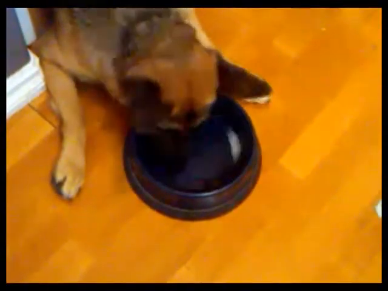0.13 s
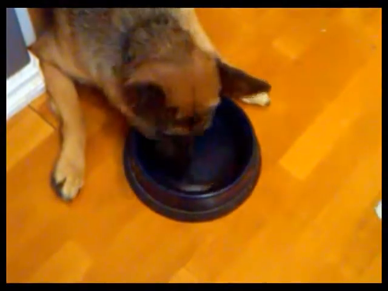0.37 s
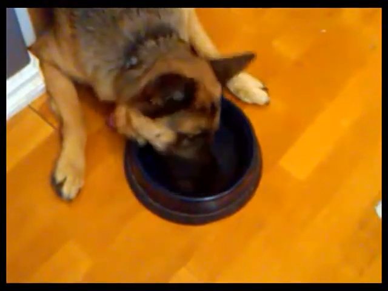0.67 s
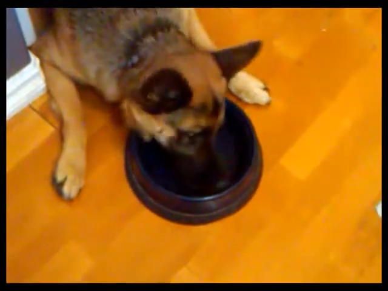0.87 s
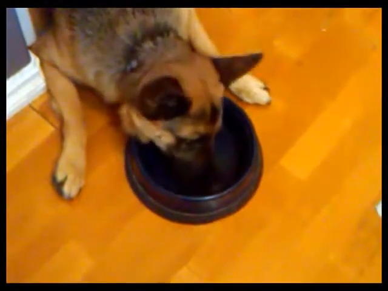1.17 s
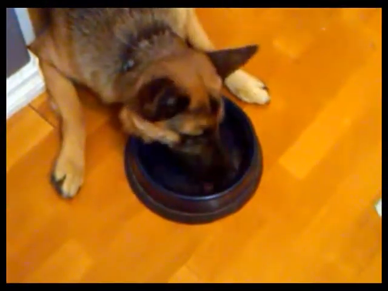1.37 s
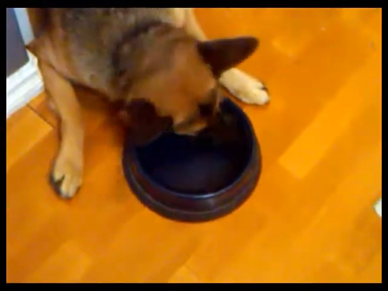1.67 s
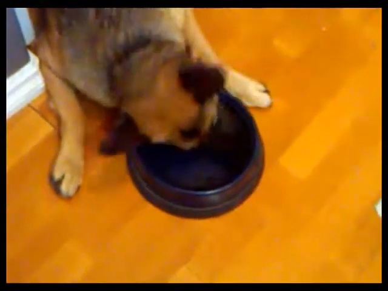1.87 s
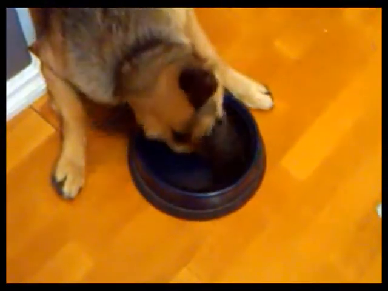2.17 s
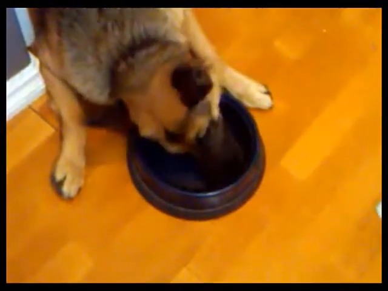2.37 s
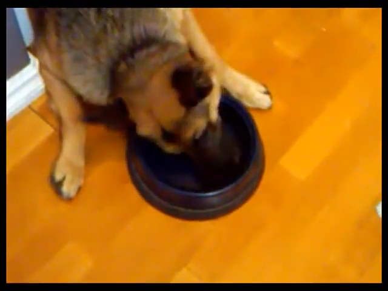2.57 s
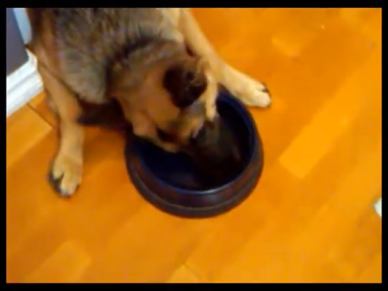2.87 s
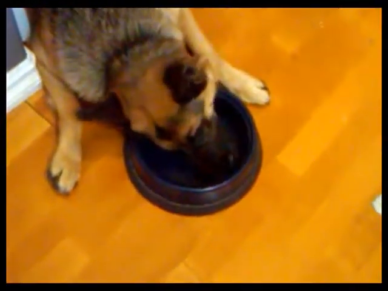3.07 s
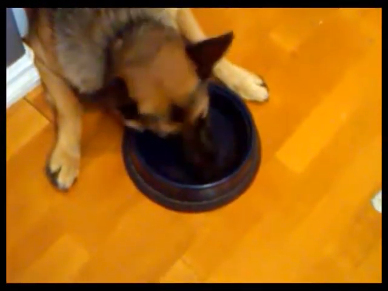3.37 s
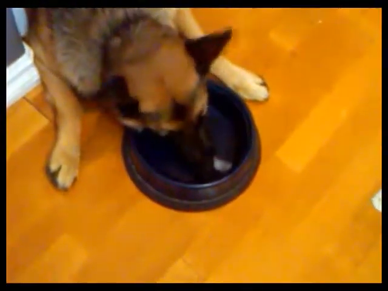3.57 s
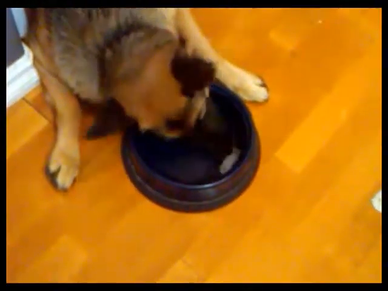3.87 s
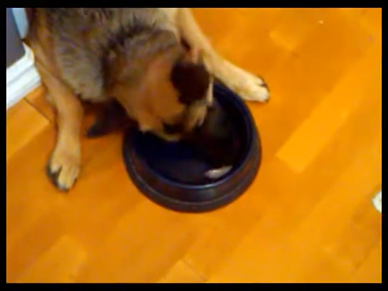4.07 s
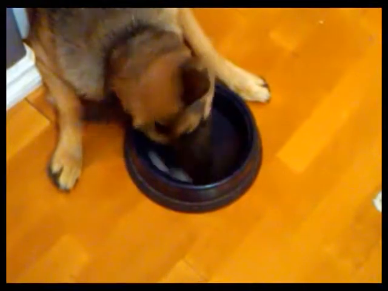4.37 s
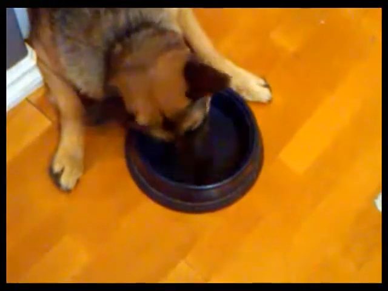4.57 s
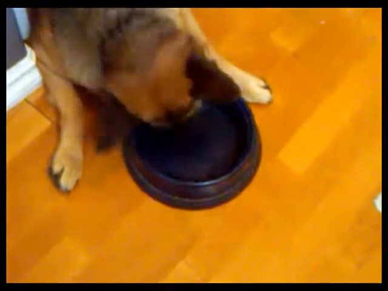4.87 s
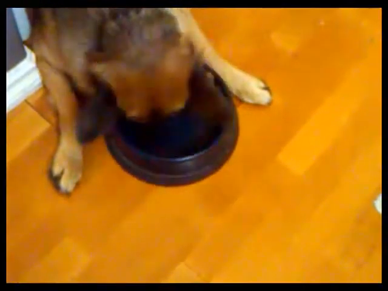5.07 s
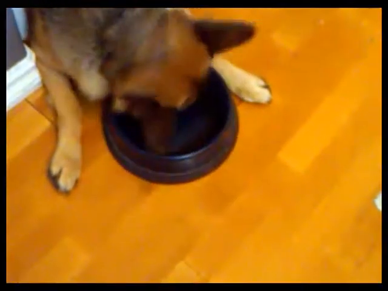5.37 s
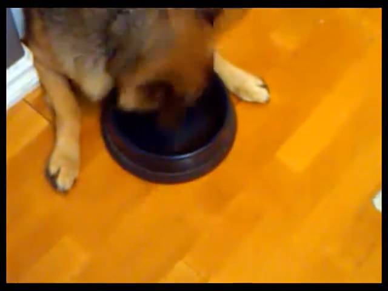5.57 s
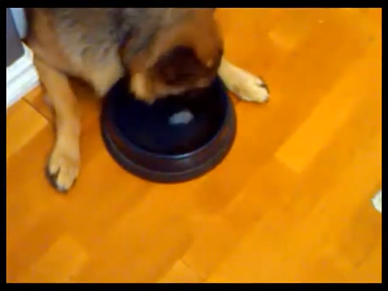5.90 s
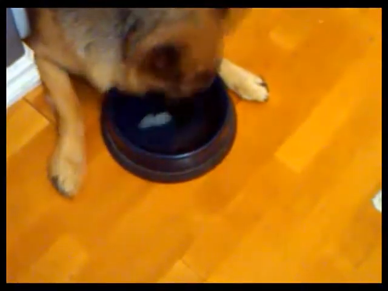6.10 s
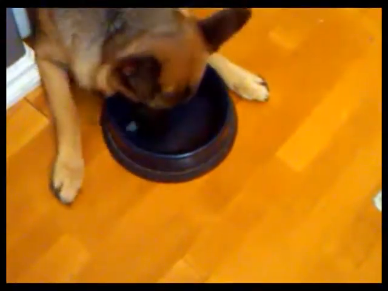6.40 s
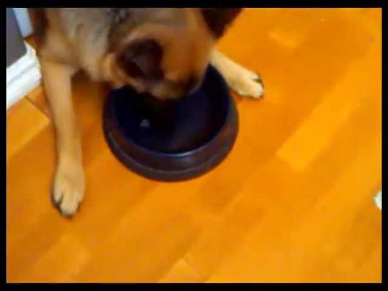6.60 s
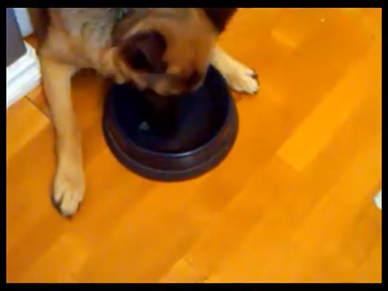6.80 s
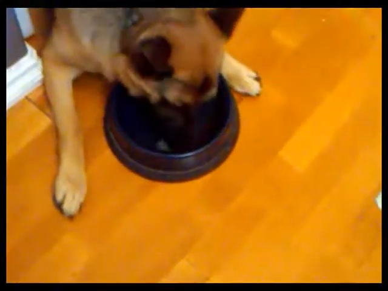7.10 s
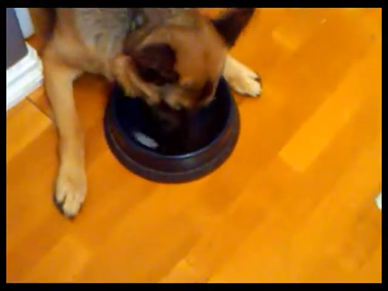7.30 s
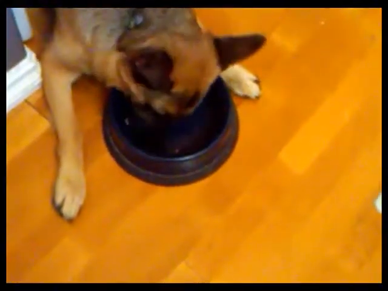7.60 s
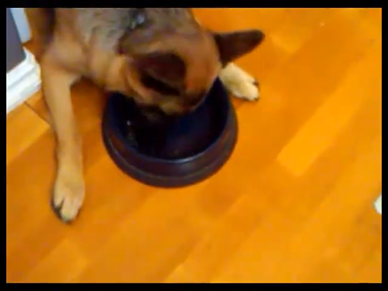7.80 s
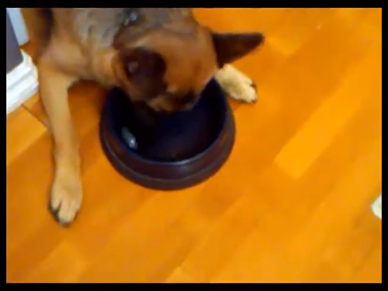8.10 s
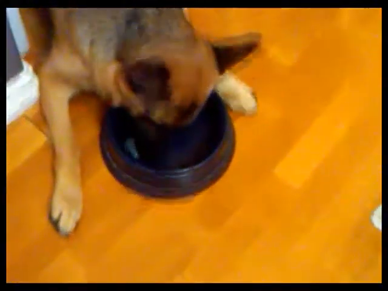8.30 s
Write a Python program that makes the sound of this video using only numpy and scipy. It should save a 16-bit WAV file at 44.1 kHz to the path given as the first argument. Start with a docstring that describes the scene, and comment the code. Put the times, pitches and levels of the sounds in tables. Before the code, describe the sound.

A dog pushes a lump of ice around a hard plastic bowl with faint wet licks. The ice clacks, cracks and skids in irregular bursts, thins to light ticks, then picks up again. Past the middle the bowl thumps and drags on the wooden floor and the ice squeaks briefly, before more sharp knocks. A small microphone catches it in a bare, slightly echoing room with faint hum and hiss.

```python
"""On the wooden floor of a bare room, a dog noses and licks a lump of ice round a hard plastic bowl.
Impacts and sliding friction excite the modes of the bowl's wall; bumps and drags on the boards excite
the air under it. The ice cracks and sheds shards, and squeaks by stick-slip; bubbles of melt water
burst at the tongue, and a thin whistle comes and goes. The room reverberates over a steady hum,
and a small microphone adds its hiss."""
import sys
import numpy as np
from scipy import signal
from scipy.fft import rfft, irfft
from scipy.io import wavfile
from scipy.ndimage import uniform_filter1d

SR = 44100
rng = np.random.default_rng(int(sys.argv[2]) if len(sys.argv) > 2 else 0)


def dump(signal):
    """Clip the signal to [-1, 1] and save it as 16-bit WAV at the path in sys.argv[1]."""
    limited = np.clip(np.atleast_2d(signal).T, -1, 1)
    pcm = np.round(limited * 32767).astype(np.int16)
    wavfile.write(sys.argv[1], SR, pcm)


N = 372644


def from_db(db):
    """Amplitude ratio of a level in decibels."""
    return 10 ** (np.asarray(db) / 20)

def unit_rms(x):
    """Normalisation to unit power."""
    return x / np.sqrt(np.mean(x ** 2) + 1e-20)

def butterworth(x, order, hz, kind):
    """Filtering with a maximally flat passband."""
    return signal.sosfilt(signal.butter(order, hz, kind, fs=SR, output="sos"), x)

def at_hz(table, hz, column=1):
    """Interpolation of a spectrum on a logarithmic frequency axis."""
    table = np.array(table)
    return np.interp(np.log(hz), np.log(table[:, 0]), table[:, column])

def coupling(hz, best_hz, octaves):
    """Modal coupling: a bell curve, 1 where the two frequencies meet."""
    return np.exp(-(np.log2(hz / best_hz) / octaves) ** 2)

def impulses(start_s, gains):
    """Brief contacts idealised as an impulse train."""
    out = np.full(N, 1e-18)
    np.add.at(out, np.clip((np.asarray(start_s) * SR).astype(int), 0, N - 1), gains)
    return out

def ring(force, hz, t60_s):
    """Damped oscillator: a unit impulse starts a decaying sine of height 1."""
    r, w = from_db(-60 / (t60_s * SR)), 2 * np.pi * hz / SR
    return signal.lfilter([0, np.sin(w)], [1, -2 * r * np.cos(w), r * r], force)

def decays(start_s, level_db, t60_s):
    """Exponential decay from each onset."""
    return signal.lfilter([1], [1, -from_db(-60 / (t60_s * SR))], impulses(start_s, from_db(level_db)))

def grit(per_s, spread_db):
    """Shot noise: randomly timed impulses of uneven size."""
    sizes = from_db(spread_db * np.minimum(rng.exponential(1, N), 4)) * rng.choice([-1, 1], N)
    return unit_rms(sizes * (rng.random(N) < per_s / SR)) + 1e-18

def narrow_noise(bands):
    """Noise-driven resonances, with decay time inverse to bandwidth."""
    return sum(from_db(db) * unit_rms(ring(rng.standard_normal(N), hz, np.log(1000) / np.pi / width_hz))
               for hz, width_hz, db in bands)

def strokes(rows, knee, ends_db, glide=1):
    """Envelopes: a row has its level at the share `knee` of its length, offset by ends_db at both ends.
    Further columns become curves too; the last moves by the ratio `glide` after the knee."""
    points = []
    for start_s, length_s, db, *rest in rows:
        end_s, final = start_s + length_s, [*rest[:-1], *np.multiply(rest[-1:], glide)]
        points += [(start_s - .01, -120, *rest), (start_s, db + ends_db, *rest),
                   (start_s + knee * length_s, db, *rest),
                   (end_s, db + ends_db, *final), (end_s + .01, -120, *final)]
    times, *columns = np.transpose(points)
    return [np.interp(np.arange(N) / SR, times, column) for column in columns]

def pings(start_s, level_db, hz, rise_cycles, decay_cycles):
    """Transients of constant Q: each sine swells, then falls 60 dB, in set numbers of cycles."""
    samples = np.arange(SR // 40)
    cycles = samples / SR * hz[:, None]
    rise = np.sin(np.pi / 2 * np.minimum(cycles / rise_cycles, 1)) ** 2
    fall = from_db(level_db[:, None] - 60 * np.maximum(cycles - rise_cycles, 0) / decay_cycles)
    out = np.zeros(N + SR)
    np.add.at(out, (start_s * SR).astype(int)[:, None] + samples, np.sin(2 * np.pi * cycles) * rise * fall)
    return out[:N]


# hum of the house: pitch_hz, width_hz, level_db
HUM_BANDS = [(88, 18, -80.5), (353.4, 8.8, -76.5)]

def hum():
    """Narrow-band noise is heard as a steady low hum."""
    return narrow_noise(HUM_BANDS)

# room tone and microphone noise: frequency_hz, relative_density_db
HISS_SPECTRUM = [(18, -31), (30, -4), (62, -8), (100, -5), (140, -10), (340, -6), (450, -14), (1000, -15),
                 (1600, -20), (3150, -24), (7200, -31), (9360, -61), (15800, -120)]

def hiss():
    """Stationary noise: white noise takes the colour of the quiet room and the microphone."""
    hz = np.maximum(np.arange(N // 2 + 1) * SR / N, 1)
    spectrum = rfft(rng.standard_normal(N)) * from_db(at_hz(HISS_SPECTRUM, hz))
    return from_db(-69) * unit_rms(irfft(spectrum, N))

def rounded_contact(x):
    """Contact time limits bandwidth: a rounded face of the ice imparts little treble."""
    return butterworth(x, 3, 2400, "low")

# modes of the bowl's wall: pitch_hz, level_db, t60_s
WALL_MODES = [(594, -15.5, 0.03), (622, -6, 0.045), (798, 0, 0.057), (876, -1, 0.054), (910, -4, 0.027),
              (1055.4, -6, 0.06), (1185, -5, 0.032), (1268.6, -1.5, 0.046), (1312, -1.5, 0.048),
              (1389, -11, 0.0056), (1569.4, 1, 0.031), (1680, -6, 0.053), (1807.7, -3.5, 0.041),
              (1946, 0, 0.017), (2100, 1.5, 0.012), (2330, -2, 0.0033), (2440, -9.5, 0.014),
              (2527, -8.5, 0.024), (2890, -14.5, 0.022), (3070, -15.5, 0.022), (3270, -17.5, 0.0058),
              (3640, -26, 0.0083), (4160, -14.5, 0.017)]

def wall(force):
    """Modal superposition: force(k, hz, edge_share) drives mode k; hard edges reach the high modes."""
    low = high = 0
    for k, (hz, level_db, t60_s) in enumerate(WALL_MODES):
        edge_share = np.clip(np.log2(hz / 1800) / 0.98, 0, 1)
        mode = from_db(level_db) * ring(force(k, hz, edge_share), hz, t60_s)
        if edge_share > 0:
            high += mode
        else:
            low += mode
    return rounded_contact(low) + high

# modes of the air under the bowl: pitch_hz, level_db, t60_s
CAVITY_MODES = [(156, -27, 0.0017), (190, -11.5, 0.0014), (225, -18, 0.071), (292.7, 1.5, 0.14),
                (348.5, -4, 0.15), (457, -29, 0.001), (570, -11.5, 0.019)]

def cavity(force):
    """Cavity resonance: force(k, hz, mode_db) drives mode k of the air under the bowl."""
    return sum(ring(force(k, hz, db), hz, t60_s) for k, (hz, db, t60_s) in enumerate(CAVITY_MODES))

# ice striking the bowl: start_s, level_db, spot_pitch_hz, hard_edge_db, chatter_db
ICE_KNOCKS = [(0.0165, -13.5, 1580, -7, -12), (0.031, -23.5, 1060, -5.5, -8),
              (0.075, -23, 1780, -8.5, -9.5), (0.104, -17.5, 1130, -13.5, -11),
              (0.173, -32, 1100, -16.5, -13), (0.275, -35.5, 1250, -38.5, -5),
              (0.292, -22, 1220, -19.5, -11.5), (0.384, -15.5, 1207, -12, -20.5),
              (0.412, -29, 880, -24, -31), (0.628, -11.5, 1570, -7, -8), (0.6367, -7, 1325, -28, -32.5),
              (0.648, -22.5, 1500, -11, -18), (0.657, -17.5, 1310, -14.5, -5.5),
              (0.722, -29, 1580, -8, -10), (0.745, -24, 900, -12, -16), (0.771, -21, 1360, -12, -41),
              (0.781, -24.5, 1530, -11.5, -19), (0.798, -27.5, 880, -3.5, -13),
              (1.204, -18.5, 1260, -12, -26), (1.243, -21.5, 1340, -8.5, -12), (1.276, -21, 1650, 5, -22.5),
              (1.296, -33.5, 930, -6.5, -3), (1.439, -29.5, 1300, -7.5, -11),
              (1.473, -22.5, 1350, -13.5, -22), (1.558, -30, 940, -6, -11.5), (1.648, -25, 1680, -6, -18),
              (1.721, -27, 1760, -3, -16), (1.752, -38, 840, -8, -6), (1.82, -32, 790, -1.5, -9),
              (1.861, -29, 980, -13, -12), (2.004, -43.5, 1100, -24, -1.5), (2.088, -38, 1820, -7, -12.5),
              (2.156, -30.5, 1790, -11, -21), (2.182, -36, 1170, -42, -14.5),
              (2.281, -32.5, 740, 3.5, -13.5), (2.351, -49, 1785, 5, -24), (2.538, -52, 630, -22, -23),
              (2.683, -51, 643, -25, -13), (2.699, -31, 943, -5, -4.5), (2.716, -43, 910, 0.5, -25),
              (2.869, -36, 1240, -13, -24), (2.939, -30.5, 1146, -16, -12), (3.01, -42, 874, -22, -6.5),
              (3.09, -38, 1264, -32, -13.5), (3.366, -40.5, 1260, -32, -18), (3.52, -34, 1330, -16.5, -17),
              (3.557, -49, 1354, -20, -34), (3.809, -29.5, 1050, -10, -14), (3.962, -29, 1160, -8, -20),
              (4.076, -20.5, 1680, -10, -18.5), (4.101, -25.5, 1670, -3, -9),
              (4.152, -23.5, 1710, -5.5, -12), (4.286, -22, 1290, -13, -26),
              (4.5355, -26.5, 1810, -7.5, -11.5), (4.555, -44, 2080, -14, -21.5),
              (4.577, -33, 1320, -29, -23), (4.606, -31, 2000, -34, -17), (4.637, -35, 790, -10, -9),
              (4.652, -28, 1940, -25, -33), (4.668, -15, 1260, -11.5, -27), (4.681, -22.5, 1900, -21, -20),
              (4.734, -26.5, 1210, -13.5, -9), (4.852, -44, 1190, -36, -17), (5.035, -38.5, 1770, -32, -20),
              (5.074, -44, 1230, -44, -7), (5.116, -32, 1110, -24.5, -19), (5.14, -26, 630, -8, -28),
              (5.172, -31.5, 880, -39, -5.5), (5.192, -22, 1780, -11, -22), (5.214, -26, 1740, -22, -7.5),
              (5.264, -20.5, 1200, -15, -15.5), (5.372, -32.5, 1480, -22, -9),
              (5.446, -36.5, 1290, -22, -1.5), (5.461, -34.5, 1310, -38, -6),
              (5.551, -33, 1570, -15.5, -11.5), (5.611, -37.5, 836, -25.5, -10.5),
              (5.859, -50, 844, -24, 8.5), (5.864, -23.5, 797, -11.5, -18.5), (6.003, -18.5, 750, -16, -21),
              (6.006, -18.5, 990, -7.5, -12.5), (6.0102, -8.5, 1170, -11.5, -21),
              (6.048, -18.5, 600, -38, -17), (6.126, -31.5, 600, -14, -10), (6.187, -41, 625, -3.5, -28),
              (6.442, -48.5, 920, -14, -31), (6.483, -32.5, 1093, -10.5, -3.5),
              (6.506, -24.5, 1130, -14.5, -8.5), (6.776, -33, 1360, -11.5, -10.5),
              (7.104, -27, 860, -27.5, -14.5), (7.129, -49.5, 775, -29, -23),
              (7.284, -51.5, 900, -30.5, -10.5), (7.3, -42.5, 1310, -41.5, -22),
              (7.344, -20, 1275, -27, -19), (7.378, -42.5, 1330, -47.5, -21), (7.404, -40, 1400, -46, -14),
              (7.431, -7, 1366, -14, -21), (7.451, -33.5, 905, 2, -14), (7.465, -36.5, 1330, -6, -20.5),
              (7.483, -39, 1330, -10, -28), (7.511, -34.5, 1330, -13, -22.5), (7.642, -35, 1300, -28, -23),
              (7.704, -34.5, 1320, -33, -10.5), (7.738, -24, 1270, -19, -12.5),
              (7.755, -30, 1900, -14, -14.5), (7.757, -38, 1810, -18, -5.5), (7.76, -33, 2000, -22, -14),
              (7.764, -30.5, 1620, -22, -29), (7.77, -28, 855, -21, -25.5), (7.779, -43.5, 870, -11, -32),
              (7.998, -16.5, 1278, -16.5, -15.5), (8.029, -38.5, 1370, -7.5, -8)]

def knocks(slips, splinters):
    """Impact excitation: each blow favours the modes near the pitch of the spot struck, then chatters."""
    start_s, level_db, spot_hz, edge_db, chatter_db = np.transpose(ICE_KNOCKS)
    scatter_db = 2.5 * rng.uniform(-2.1, 1, (len(start_s), len(WALL_MODES)))
    # rough ice lands in three contacts within 3 ms, each weaker than the one before in the series
    chance = rng.random((len(start_s), 6))
    contact_s = start_s[:, None] + .003 * chance[:, :3] * [0, 1, 1]
    contact_gain = from_db(-0.5 - 7 * np.arange(3)) * np.sign(chance[:, 3:] - .5)

    def force(k, hz, edge_share):
        spot_db = 9.9 * coupling(hz, spot_hz, 0.18) + scatter_db[:, k]
        blow_db = level_db - 20 + spot_db + edge_share * (edge_db + 19)
        blows = (-1) ** k * impulses(contact_s, from_db(blow_db)[:, None] * contact_gain)
        chatter = decays(start_s, blow_db - 0.62 * spot_db + chatter_db - 10, 0.11)
        # slips touch shifting spots; splinters strike all modes at once
        return blows + chatter * (np.roll(slips, 97 * k) + from_db(-6.5) * splinters)

    # the contact itself radiates a bright burst, grit and a dry snap
    bright_db = level_db + edge_db
    swell = decays(start_s, bright_db - 6.5, 0.047) - decays(start_s, bright_db - 8, 0.0059)
    burst = butterworth(swell * rng.standard_normal(N), 2, [2500, 6000], "band")
    grains = rasp(slips + splinters, decays(start_s, bright_db + chatter_db + 2.5, 0.084))
    snap = pings(start_s, level_db - 4, spot_hz, rise_cycles=1.5, decay_cycles=10)
    boom = cavity(lambda k, hz, mode_db: impulses(start_s + 0.0017, from_db(level_db - 26 + mode_db)))
    return wall(force) + rounded_contact(boom + snap) + burst + grains

def rasp(roughness, envelope):
    """Roughness noise: tiny contacts radiate directly in a treble band."""
    return butterworth(roughness * envelope, 3, [2800, 3900], "band")

# fractures in the ice: start_s, level_db, pitch_hz
ICE_CRACKS = [(0.0169, -18.5, 3400), (0.0737, -21, 2660), (0.1027, -24.5, 2840), (0.2773, -52, 2200),
              (0.2947, -42, 2450), (0.3835, -36, 2280), (0.628, -10, 3430), (0.7801, -26, 2570),
              (0.7976, -27.5, 2180), (1.2032, -44, 2640), (1.2446, -30, 2630), (1.278, -14.5, 2390),
              (1.4391, -32, 2400), (1.4726, -39, 2720), (1.5569, -36.5, 2160), (1.6477, -35, 2120),
              (1.7215, -58, 2320), (1.7529, -38, 2200), (1.8213, -52, 2350), (1.8607, -47, 2140),
              (2.0033, -47, 2330), (2.0896, -44, 2260), (2.1565, -41, 2350), (2.2812, -34.5, 2370),
              (2.3511, -42.5, 4110), (2.6978, -31.5, 2370), (2.8689, -52, 2790), (2.9397, -50, 2300),
              (3.5204, -55.5, 2120), (3.8067, -38.5, 3000), (3.9579, -36.5, 2840), (4.0751, -26, 3180),
              (4.0981, -31, 2470), (4.152, -35, 2180), (4.2802, -38, 2200), (4.5306, -41, 2320),
              (4.5361, -28.5, 2400), (4.6364, -33, 3240), (4.6508, -38, 2100), (4.6678, -25, 2540),
              (4.7346, -40, 2170), (5.1188, -33.5, 2510), (5.1407, -35, 2380), (5.1931, -39, 3060),
              (5.2654, -34, 2280), (5.3727, -49, 2240), (5.448, -29, 2600), (5.5508, -38.5, 2460),
              (5.8646, -30.5, 2120), (6.0082, -17, 2430), (6.4842, -32, 2330), (6.5066, -44, 2200),
              (6.775, -44, 2200), (7.1023, -38, 2316), (7.3362, -49.5, 2070), (7.3427, -42, 2290),
              (7.43, -14.5, 2160), (7.7393, -29, 2510), (7.7623, -25.5, 2220), (7.9992, -33, 2330)]

def cracks():
    """Brittle fracture: each crack pings and sheds fourteen shards that tick within 75 ms."""
    start_s, level_db, pitch_hz = np.transpose(ICE_CRACKS)
    lateness, smallness, height = np.moveaxis(rng.random((len(start_s), 14, 3)), 2, 0)
    shard_s = start_s[:, None] + .075 * lateness
    shard_db = level_db[:, None] - 10 - 11 * lateness - 12 * smallness
    shard_hz = 1900 * (3900 / 1900) ** height
    shape = dict(rise_cycles=3.5, decay_cycles=34)
    shards = pings(shard_s.ravel(), shard_db.ravel(), shard_hz.ravel(), **shape)
    return pings(start_s, level_db - 6.5, pitch_hz, **shape) + shards

# the tongue on wet ice: start_s, length_s, level_db
TONGUE_LICKS = [(.02, 0.3, -66.5), (.74, 0.41, -74), (1.3, 0.61, -69), (1.95, 0.52, -76),
                (4.1, 0.23, -72.5), (4.65, 0.19, -67), (7.45, 0.21, -71)]

def licks():
    """Shot noise: tiny bubbles of melt water burst in a dense, bright crackle."""
    level_db, = strokes(TONGUE_LICKS, knee=0.34, ends_db=0)
    crackle = butterworth(grit(per_s=11000, spread_db=7), 2, [2800, 6800], "band")
    return from_db(level_db) * unit_rms(crackle)

def soft_contact(x):
    """Compliance as a low-pass filter: the soft contact of foot and boards loses treble."""
    return signal.lfilter([.12], [1, -.88], x)

# the bowl's foot striking the boards: start_s, level_db, pitch_hz
FOOT_BUMPS = [(0.024, -50, 299), (0.07, -41, 374), (0.29, -54, 294), (0.383, -59, 296), (0.631, -29, 374),
              (0.743, -32.5, 296), (1.202, -32, 363), (1.26, -36, 300), (1.438, -53, 290),
              (1.574, -47, 287), (1.657, -39.5, 293), (1.724, -38.5, 304), (1.862, -43.5, 303),
              (2.072, -43, 281), (2.695, -47.5, 340), (2.938, -61.5, 290), (3.152, -53.5, 288),
              (3.524, -49.5, 290), (3.719, -52.5, 306), (3.779, -31, 256), (3.96, -36, 286),
              (4.027, -44, 302), (4.075, -42, 305), (4.286, -38.5, 293), (4.328, -42, 296),
              (4.447, -56.5, 296), (4.534, -54.5, 292), (4.615, -55, 295), (4.665, -52, 294),
              (4.734, -40, 310), (4.993, -45, 224), (5.12, -37.5, 291), (5.168, -14, 220),
              (5.255, -21, 186), (5.373, -53, 286), (5.444, -39, 319), (5.551, -32.5, 293),
              (5.608, -23, 250), (5.861, -23.5, 223), (6.005, -29, 288), (6.118, -27.5, 298),
              (6.444, -42.5, 296), (6.501, -28, 276), (6.776, -41, 289), (6.945, -51.5, 295),
              (7.102, -50, 299.5), (7.341, -47, 284), (7.428, -32, 288), (7.704, -41.5, 301),
              (7.73, -35.5, 278), (7.762, -45, 280), (7.997, -41, 288)]

def bumps():
    """Contact damping: the cavity rings freely while the bumped bowl rocks, less once it settles."""
    start_s, level_db, pitch_hz = np.transpose(FOOT_BUMPS)
    rock_s, settled_db = .032, -13
    rocking = np.cumsum(impulses(start_s, 1) - impulses(start_s + rock_s, 1)) > .5
    freedom = uniform_filter1d((rocking | np.roll(rocking, -150)).astype(float), size=300)

    def force(k, hz, mode_db):
        return impulses(start_s, from_db(level_db - 19 + mode_db + 20.9 * coupling(hz, pitch_hz, 0.19)))

    return soft_contact(from_db(settled_db * (1 - freedom)) * cavity(force))

# ice sliding over the bottom: start_s, length_s, level_db, brightness_db, spot_pitch_hz
ICE_SKIDS = [(.11, 0.23, -38, -6, 1160), (.275, 0.086, -33.5, -35, 1240), (.39, 0.16, -35, -7, 1030),
             (.67, 0.38, -41.5, 0.5, 1270), (1.21, 0.14, -29, -42, 1360), (1.73, 0.15, -43, -13, 1320),
             (2.05, 0.14, -45, -0.5, 1520), (2.29, 0.063, -61, 6, 1102), (2.7, 0.18, -53, 8.5, 1003),
             (3.73, 0.053, -45.5, -22, 1170), (3.815, 0.077, -67, -5, 1310), (3.965, 0.039, -44, -9, 1484),
             (4.08, 0.29, -36.5, -2.5, 1730), (4.29, 0.16, -57.5, -8, 1280), (4.54, 0.065, -44, -4.5, 1950),
             (4.608, 0.031, -33, -28, 2000), (4.68, 0.29, -45.5, -23, 1220), (5.12, 0.14, -34, -13, 1050),
             (5.31, 0.089, -59, -3, 1103), (5.45, 0.14, -49, -7, 2020), (5.62, 0.15, -56.5, -16, 1470),
             (5.77, 0.054, -44, 4, 835), (5.87, 0.067, -63.5, -7, 960), (6.01, 0.39, -45, -15, 946),
             (6.49, 0.12, -49.5, -8, 1210), (7.29, 0.12, -44.5, -29, 1268),
             (7.372, 0.075, -45.5, -25, 1450), (7.45, 0.24, -42, 1.5, 1470),
             (7.72, 0.041, -47, -18.5, 1140)]

def skids(slips, splinters):
    """Sliding friction: random slips drive the wall, and the favoured pitch sinks as the ice slows."""
    level_db, bright_db, spot_hz = strokes(ICE_SKIDS, knee=0.1, ends_db=-10, glide=.8)

    def force(k, hz, edge_share):
        drive_db = level_db - 43 + 10 * coupling(hz, spot_hz, .15) + edge_share * (bright_db + 5.5)
        return from_db(drive_db) * np.roll(slips, 97 * k)

    return wall(force) + rasp(slips + splinters, from_db(level_db + bright_db - 23.5))

# the bowl sliding on the boards: start_s, length_s, level_db, pitch_hz
BOWL_DRAGS = [(.63, 0.096, -35, 308), (.74, 0.053, -47, 314), (3.74, 0.14, -44.5, 289.4),
              (3.97, 0.035, -43, 301), (4.96, 0.082, -46.5, 204), (5.11, 0.18, -26, 239),
              (5.35, 0.059, -51, 255), (5.44, 0.077, -41.5, 293), (5.56, 0.41, -51, 270),
              (6.0, 0.059, -25, 275), (6.12, 0.1, -44.5, 276), (6.48, 0.059, -29.5, 240),
              (7.69, 0.14, -42, 288.3)]

def drags():
    """Irregular stick-slip: the stuttering foot drives the cavity into a rumble."""
    level_db, pitch_hz = strokes(BOWL_DRAGS, knee=0.44, ends_db=-17)
    stutter = grit(per_s=230, spread_db=4)

    def force(k, hz, mode_db):
        drive_db = level_db - 42 - 0.36 * mode_db + 14 * coupling(hz, pitch_hz, 0.51)
        return from_db(drive_db) * np.roll(stutter, 311 * k)

    return soft_contact(cavity(force))

# resonances of the whistle: pitch_hz, width_hz, level_db
WHISTLE_RESONANCES = [(4600, 120, -10), (6845, 90, -3)]
# puffs of the whistle: start_s, length_s, level_db
WHISTLE_PUFFS = [(.8, 0.04, -66), (.905, 0.032, -61), (.99, 0.088, -61.5), (2.02, 0.047, -72),
                 (2.1, 0.076, -66)]

def whistle():
    """Narrow-band noise at two resonances is heard as a thin, airy whistle."""
    level_db, = strokes(WHISTLE_PUFFS, knee=0.14, ends_db=4)
    return from_db(level_db) * narrow_noise(WHISTLE_RESONANCES)

# wet ice sticking and slipping: start_s, length_s, level_db, slip_rate_hz
ICE_SQUEAKS = [(4.61, 0.033, -47, 690), (5.438, 0.088, -39, 663.5), (7.295, 0.017, -66.5, 676),
               (7.372, 0.015, -62, 770)]

def squeaks():
    """Stick-slip oscillation: nearly periodic slips ring three resonances in the bowl's middle range."""
    level_db, slip_hz = strokes(ICE_SQUEAKS, knee=0.75, ends_db=-27.5, glide=0.88)
    wobble = 0.036 * unit_rms(uniform_filter1d(rng.standard_normal(N), size=150))
    slip_count = np.floor(np.cumsum(slip_hz * (1 + wobble)) / SR)
    slips = np.diff(slip_count, prepend=0) * from_db(rng.normal(0, 2.5, N))
    tone = (ring(slips, 1360, 0.0055) - from_db(-4) * ring(slips, 2030, 0.0056)
            + from_db(-12.5) * ring(slips, 2680, 0.012))
    return from_db(level_db) * unit_rms(tone)

# reverberation of the bare room: frequency_hz, t60_s, level_db
ROOM_DECAY = [(99.1, 0.074, -7), (292.6, 0.22, -2), (643, 0.35, 4), (1590, 0.36, -2), (3564, 0.32, -2.5),
              (7050, 0.6, -2)]

def room(x):
    """Reverberation: a diffuse tail builds after the first reflection and decays band by band."""
    first_wall_s, tail = 0.0053, 0
    t = np.arange(SR // 2) / SR
    edges_hz = 60 * 2 ** np.arange(0, 8, .5)
    for low, high in zip(edges_hz, edges_hz[1:]):
        band = butterworth(rng.standard_normal(len(t)), 2, [low, high], "band")
        hz = np.sqrt(low * high)
        tail += band * from_db(at_hz(ROOM_DECAY, hz, column=2) - 60 * t / at_hz(ROOM_DECAY, hz))
    tail *= np.clip(t / first_wall_s - 1, 0, 1)
    return signal.fftconvolve(x, tail / np.sqrt(np.sum(tail ** 2)))[:N]

def scene():
    """Superposition of direct sound, reverberation, hum and hiss."""
    slips, splinters = grit(per_s=1500, spread_db=4.5), grit(per_s=300, spread_db=5)
    ice = knocks(slips, splinters) + cracks() + skids(slips, splinters) + squeaks()
    direct = ice + bumps() + drags() + licks() + whistle()
    direct = butterworth(direct, 3, 165, "high")      # so small a body radiates no deep bass
    return (direct + from_db(-10) * room(direct) + hum() + hiss())[None]

# peak and dip of the microphone port: frequency_hz, width_hz, gain_db
PORT_RESONANCES = [(3500, 700, 3), (4100, 400, -5)]

def record(dry):
    """Port resonance, band limiting and spectral imaging: coarse resampling mirrors the treble upward."""
    band_hz, mirror_hz, cutoff_hz = 7750, 8000, 11000
    for hz, width_hz, db in PORT_RESONANCES:
        dry = dry + (from_db(db) - 1) * signal.lfilter(*signal.iirpeak(hz, hz / width_hz, fs=SR), dry)
    narrow = signal.sosfilt(signal.cheby2(12, 50, band_hz, fs=SR, output="sos"), dry)
    folded = narrow * np.cos(4 * np.pi * mirror_hz * np.arange(N) / SR)
    image_band = signal.cheby2(10, 70, [mirror_hz, cutoff_hz + 600], "band", fs=SR, output="sos")
    image = from_db(-7.5) * signal.sosfilt(image_band, folded)
    return signal.sosfilt(signal.cheby2(12, 60, cutoff_hz, fs=SR, output="sos"), narrow + image)


dry = scene()
out = record(dry)
dump(out)
```